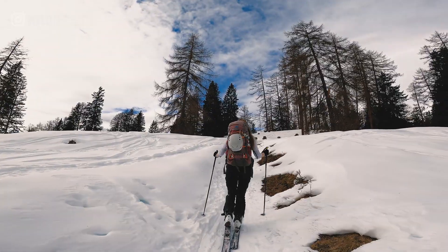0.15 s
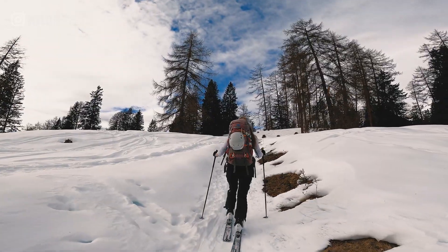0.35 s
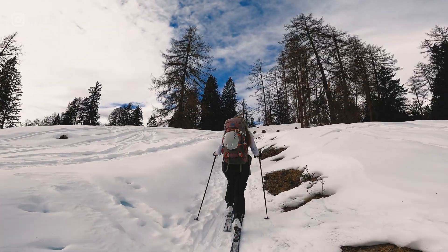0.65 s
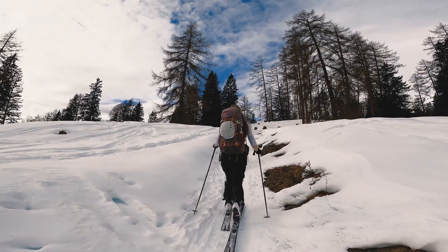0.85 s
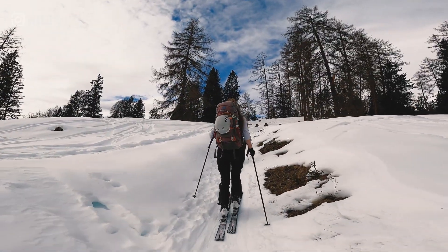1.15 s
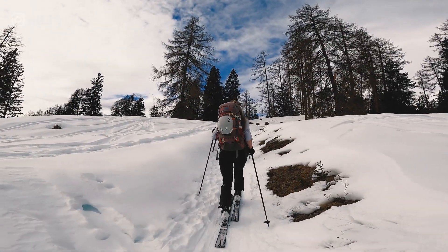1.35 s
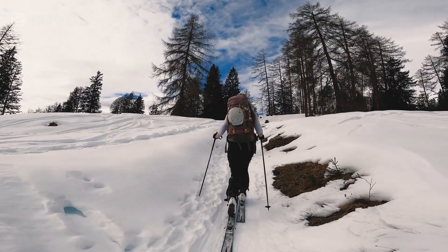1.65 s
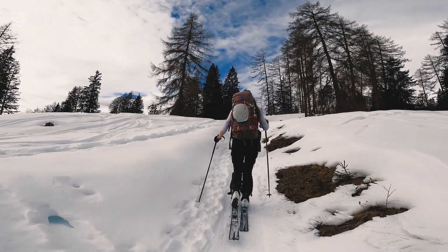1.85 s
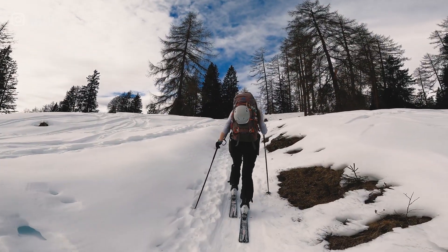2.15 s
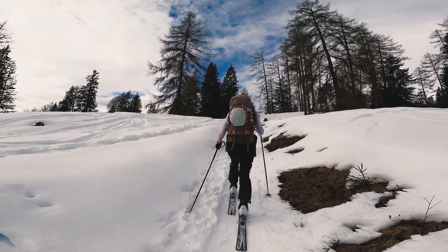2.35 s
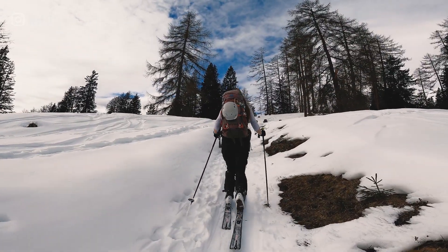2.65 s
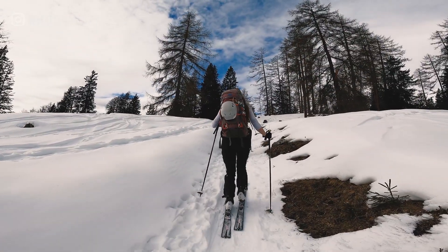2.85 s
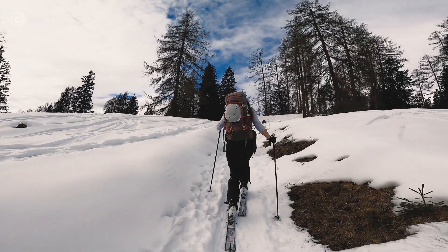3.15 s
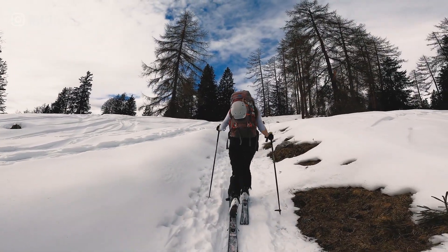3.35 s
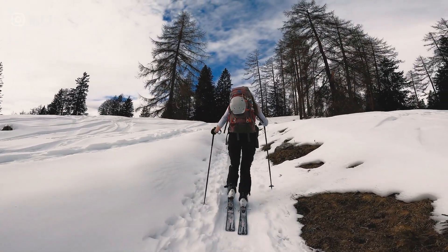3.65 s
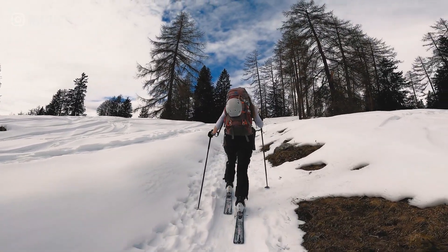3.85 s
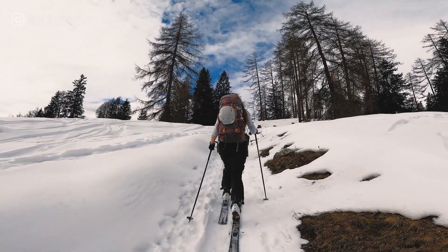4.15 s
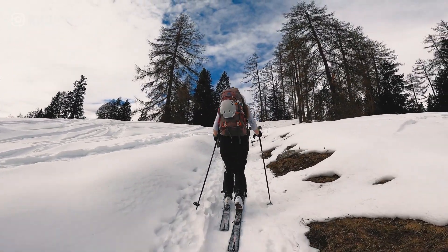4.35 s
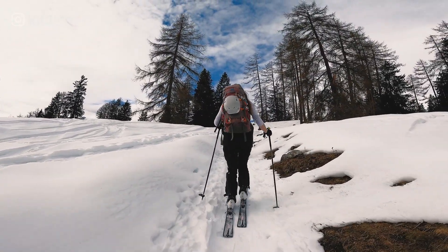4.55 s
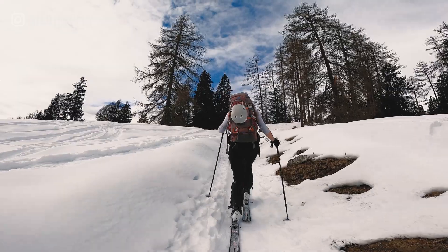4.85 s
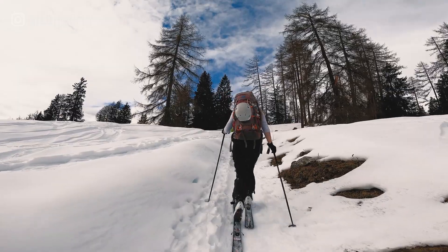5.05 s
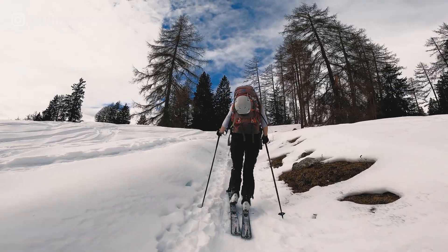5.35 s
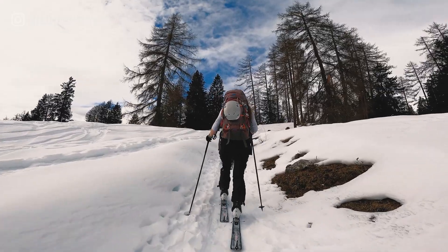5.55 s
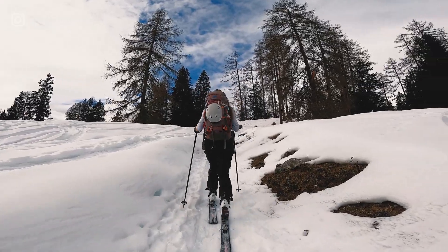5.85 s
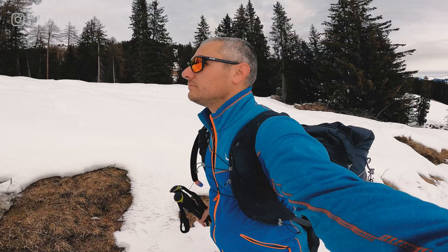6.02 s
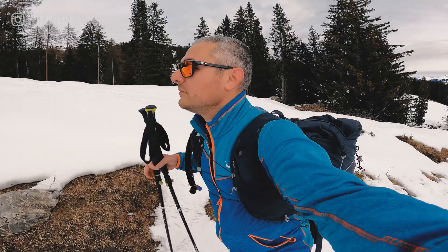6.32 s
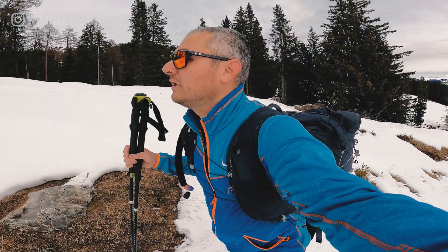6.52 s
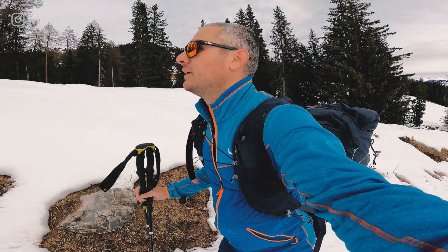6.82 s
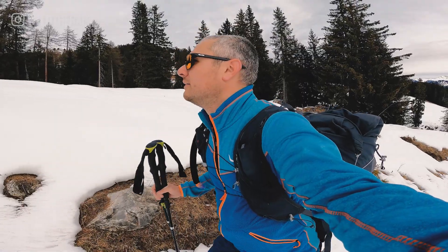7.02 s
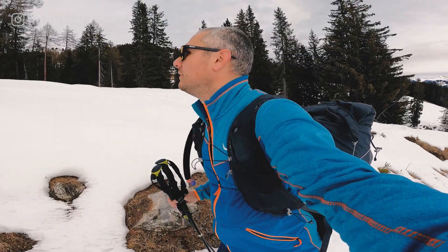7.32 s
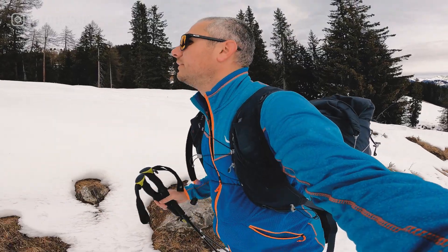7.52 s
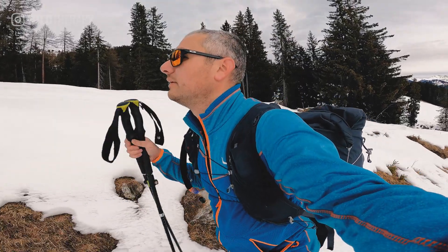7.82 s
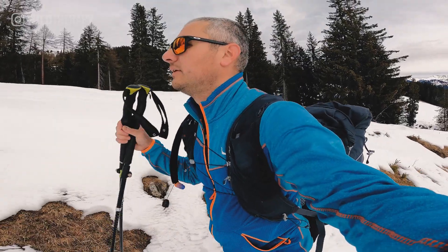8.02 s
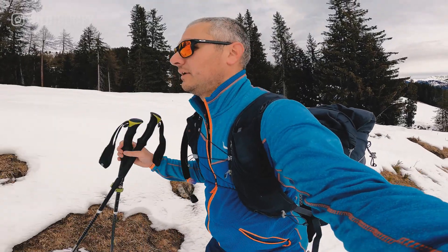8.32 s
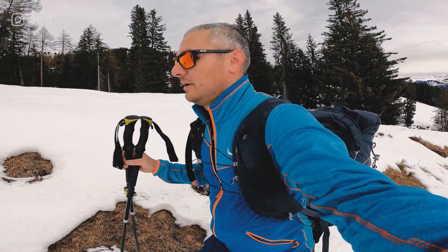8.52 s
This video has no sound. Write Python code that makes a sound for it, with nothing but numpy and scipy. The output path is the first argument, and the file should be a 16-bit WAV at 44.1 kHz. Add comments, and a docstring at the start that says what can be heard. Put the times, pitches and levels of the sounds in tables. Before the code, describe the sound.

Close, dry ski touring steps on hard snow: gritty scraping slides, hollow knocks, crisp crunches and clicks, low wind brushing a hand-held microphone.

```python
"""Ski touring climb over crusted snow

Skins drag over crust: dense grains ring resonances and hiss, crystals sizzle, rubbed skis sing on brief notes.
Each step brings filtered-grain tread and snow packing; wind rumbles as low noise of drifting level.
Dull knocks, probably boots, bindings and poles, are short sagging swings with a thud and a shudder.
Crunches, ticks and a seven-slip creak are resonant noise puffs; slow pushes reach the hand-held microphone.
Open air: no reverberation. Channels are alike but for a faint treble noise, opposite in left and right."""
import sys
import numpy as np
from scipy import signal
from scipy.fft import rfft, irfft, next_fast_len
from scipy.io import wavfile
from scipy.ndimage import uniform_filter1d

SR = 44100
rng = np.random.default_rng(int(sys.argv[2]) if len(sys.argv) > 2 else 0)


def store_pcm(level_fs):
    """Save levels as 16-bit WAV."""
    pcm = np.round(np.clip(level_fs, -1, 1) * 32767).astype(np.int16)
    wavfile.write(sys.argv[1], SR, np.atleast_2d(pcm).T)


N = 382788

# Wind, tread and packing spectra: (frequency [Hz], relative level [dB])
WIND_SPECTRUM = [(12, -11.5), (30, -22), (48, -16), (75, -18.5)]
TREAD_SPECTRUM = [(35, -33), (60, -5), (120, -10.5), (200, -21.5)]
PACKING_SPECTRUM = [(90, 3.5), (150, -0.5), (230, 1.5), (400, -4), (600, -8.5), (850, -11.5), (1200, -17)]
# Wind on the microphone: (time [s], level before the 10 dB gain [dB])
WIND_LEVEL = [(0.0, -63), (0.41, -56), (0.72, -69), (2.17, -62), (2.59, -67), (4.28, -59), (5.44, -61),
              (5.8, -65), (6.31, -49), (6.99, -54), (8.19, -48), (8.68, -57)]
# Weight comes onto a ski: (time [s], hold [s], tread felt through the hand [dB], snow packing [dB])
STEPS = [(0.0, 0.094, -41, -33), (0.44, 0.26, -31.5, -36), (0.86, 0.2, -43, -42), (1.25, 0.1, -28.5, -36.5),
         (1.42, 0.1, -36.5, -37), (2.089, 0.21, -32, -35), (2.78, 0.49, -43.5, -40), (3.5, 0.33, -36, -37),
         (3.8, 0.13, -40, -65), (4.27, 0.2, -40, -37), (4.44, 0.084, -33.5, -37), (5.02, 0.31, -34.5, -39),
         (5.62, 0.011, -37, -41), (5.8, 0.048, -35, -40), (6.13, 0.25, -40, -43), (6.39, 0.1, -38, -35.5),
         (6.86, 0.34, -37.5, -40), (7.562, 0.022, -25, -34.5), (7.9, 0.17, -36.5, -40.5),
         (8.27, 0.065, -29, -39), (8.54, 0.15, -33, -53)]
# Rise and fade times are per 10 dB
STEP_RISE_S, TREAD_FADE_S, PACKING_FADE_S = 0.0086, 0.041, 0.28
TREAD_REST_DB, PACKING_REST_DB = -67, -49.5   # between steps

# A ski slides forward: (time [s], length [s], skin drag [dB], hiss [dB], sizzle [dB])
SLIDES = [(0.0, 0.44, -35.5, -41.5, -46), (0.55, 0.42, -35, -42, -47.5), (1.15, 0.52, -38, -46, -50.5),
          (2.08, 0.38, -39.5, -44, -54), (2.78, 0.15, -43.5, -45, -49.5), (3.0, 0.2, -37, -41.5, -50),
          (3.51, 0.083, -54, -43, -55), (3.73, 0.22, -40, -45.5, -57), (4.27, 0.34, -35.5, -46, -50.5),
          (4.96, 0.42, -41.5, -49, -52), (5.76, 0.16, -39, -45.5, -50), (6.1, 0.41, -40.5, -44.5, -49),
          (6.55, 0.25, -56, -61, -61), (6.84, 0.41, -39, -44.5, -46), (7.5, 0.32, -37, -44, -44.5),
          (7.85, 0.24, -44, -47, -52), (8.23, 0.37, -38, -41, -41.5)]
SLIDE_RISE_S, SLIDE_FADE_S = 0.039, 0.084
# The ski catches and scrapes: (time [s], hold [s], skin drag [dB], hiss [dB], sizzle [dB])
SCRAPES = [(.13, 0.12, -39, -66, -66), (.26, 0.0095, -37, -60, -49), (.41, 0.0097, -60, -34, -61),
           (.6, 0.016, -46, -45, -64), (.76, 0.0072, -29, -54, -63), (.91, 0.021, -30, -38, -67),
           (1.012, 0.018, -29, -42, -65), (1.08, 0.096, -60, -46, -45), (1.335, 0.0084, -51, -44, -40.5),
           (1.38, 0.029, -52, -47, -50), (1.58, 0.021, -34, -41, -43), (1.78, 0.0086, -35.5, -44, -46),
           (1.84, 0.043, -34.5, -41.5, -58), (1.94, 0.04, -51, -45, -42), (2.02, 0.037, -39, -38, -45),
           (2.11, 0.032, -27.5, -33, -40), (2.21, 0.0095, -25.5, -40, -67), (2.255, 0.016, -53, -37, -41),
           (2.36, 0.069, -32, -40, -51), (2.49, 0.018, -29.5, -55, -70), (2.58, 0.0065, -39, -43, -50),
           (2.81, 0.037, -48, -57, -42.5), (3.1, 0.014, -39, -52, -48), (3.51, 0.038, -44, -46, -52),
           (3.6, 0.032, -33.5, -44.5, -62), (3.645, 0.014, -36, -55, -50), (3.75, 0.043, -34, -61, -69),
           (3.93, 0.013, -58, -45, -47), (3.985, 0.018, -45, -55, -45), (4.11, 0.023, -41, -52, -73),
           (4.2, 0.02, -38, -50.5, -51), (4.552, 0.035, -25, -40.5, -46), (4.66, 0.043, -48, -51, -53),
           (4.82, 0.019, -36.5, -46, -64), (4.97, 0.047, -37, -48, -54), (5.13, 0.027, -36.5, -47, -66),
           (5.185, 0.014, -31, -43, -41), (5.435, 0.023, -34.5, -41, -65), (5.49, 0.0078, -44, -56, -49),
           (5.61, 0.06, -42, -48.5, -51), (5.82, 0.017, -34, -57, -46), (5.975, 0.0037, -44, -52, -47),
           (6.07, 0.0078, -37.5, -70, -40), (6.318, 0.0067, -36, -55, -63), (6.43, 0.033, -35, -35.5, -47),
           (6.64, 0.063, -41, -54, -55), (6.783, 0.0044, -31.5, -33, -42),
           (6.809, 0.022, -31.5, -25.5, -28.5), (6.872, 0.0037, -36, -43, -36),
           (6.898, 0.015, -22, -30.5, -37), (7.1, 0.076, -37, -38.5, -47.5), (7.31, 0.0076, -44, -42, -49),
           (7.36, 0.067, -45, -48.5, -50.5), (7.73, 0.04, -35, -37, -62), (7.92, 0.035, -33.5, -51, -48),
           (8.095, 0.022, -37.5, -41, -45), (8.32, 0.057, -35.5, -32.5, -33.5),
           (8.455, 0.1, -57, -33.5, -35.5), (8.64, 0.026, -28.5, -33, -33)]
SCRAPE_RISE_S, SCRAPE_FADE_S = 0.019, 0.015
# Levels while neither ski moves: drag, hiss, sizzle [dB]
SKI_REST_DB = (-48.5, -54, -58.5)

# Resonances of the dragged ski: (frequency [Hz], width [Hz], relative level [dB])
DRAG_MODES = [(1109, 106, 12), (1420, 103, 10.5), (1645, 162, 10.5), (532, 180, 12.5), (850, 840, -3),
              (1900, 770, 0.5)]
# Snow hiss, sizzle and opposite-channel noise spectra: (frequency [Hz], relative level [dB])
HISS_SPECTRUM = [(1200, 18), (2000, 0), (2600, 1.5), (4000, -3), (5500, -29), (8000, -30)]
SIZZLE_SPECTRUM = [(3000, -7), (5500, -10.5), (8000, -10), (11000, -18), (13000, -25), (15500, -40)]
SIDE_SPECTRUM = [(2000, -35), (5000, -5.5), (9000, -2), (11500, 3), (14000, 5.5), (15500, -26)]
# The rubbed ski sings on one note: (time [s], length [s], pitch [Hz], level [dB])
SINGS = [(0.049, 0.022, 1106, -32), (0.127, 0.046, 1400, -33.5), (0.234, 0.022, 4300, -42),
         (0.673, 0.022, 1160, -33.5), (0.782, 0.02, 1520, -32), (1.375, 0.021, 1630, -31),
         (2.15, .02, 1680, -35), (2.194, 0.038, 1180, -30.5), (2.329, 0.052, 2310, -39),
         (2.813, 0.01, 1670, -32), (3.816, 0.02, 1130, -31), (4.381, 0.11, 1410, -43),
         (5.128, 0.016, 1620, -33), (5.222, 0.048, 1500, -34.5), (5.319, 0.023, 1130, -32),
         (5.886, 0.044, 1640, -37), (6.263, 0.0068, 1680, -29), (6.802, 0.026, 2550, -27),
         (7.585, 0.09, 1640, -34), (7.627, 0.061, 1050, -35), (7.757, 0.034, 1440, -31.5),
         (7.776, 0.028, 1080, -32.5), (8.208, 0.015, 1500, -33.5), (8.352, 0.066, 3130, -41),
         (8.373, 0.024, 1650, -33), (8.479, 0.061, 3230, -33.5), (8.493, 0.053, 1970, -37.5)]

# Dull knocks: (time of envelope peak [s], swing level [dB], base pitch [Hz], rise [cycles])
KNOCKS = [(0.081, -13, 323, 0.49), (0.1137, -20.5, 324, 0.75), (0.443, -13.5, 223, 0.59),
          (0.5545, -8.5, 277, 0.28), (0.6077, -9, 547, 0.99), (0.628, -15, 137, 0.31),
          (0.639, -16.5, 217, 0.37), (0.876, -13, 350, 0.27), (1.019, -20.5, 218, 0.91),
          (1.123, -20.5, 423, 0.24), (1.1745, -10, 500, 0.097), (1.2563, -6.5, 332, 0.76),
          (1.317, -16, 350, 0.92), (1.45, -18.5, 151, 0.3), (1.544, -17.5, 200, 0.27),
          (1.569, -15.5, 293, 0.22), (2.088, -7, 460, 0.77), (2.1095, -16.5, 313, 0.4),
          (2.1302, -8.5, 298, 0.19), (2.179, -16.5, 292, 0.59), (2.228, -13, 370, 0.65),
          (2.2344, -21, 258, 0.33), (2.2592, -11.5, 248, 0.48), (2.2642, -13.5, 260, 0.17),
          (2.2903, -15, 231, 0.48), (2.295, -15.5, 260, 0.26), (2.3472, -11.5, 342, 0.67),
          (2.7756, -15, 332, 0.86), (2.812, -25.5, 167, 0.49), (2.8599, -11, 467, 0.98),
          (2.902, -24.5, 204, 0.52), (2.9328, -13, 310, 0.24), (2.9923, -10.5, 540, 0.16),
          (3.0325, -9.5, 323, 0.72), (3.077, -20.5, 530, 1), (3.498, -24, 400, 0.67),
          (3.508, -14, 290, 0.14), (3.538, -17.5, 208, 0.23), (3.612, -17, 388, 0.9),
          (3.619, -17.5, 340, 0.38), (3.633, -10.5, 290, 0.49), (3.709, -22.5, 300, 0.4),
          (3.744, -18, 315, 0.85), (4.2793, -13, 373, 0.82), (4.303, -21, 396, 0.59),
          (4.381, -22, 250, 0.56), (4.399, -19, 205, 0.58), (4.4536, -16.5, 520, 0.77),
          (4.487, -14, 322, 0.55), (4.502, -19, 159, 0.72), (4.605, -14.5, 480, 0.52),
          (4.676, -21.5, 220, 0.7), (4.82, -13, 322, 0.69), (5.0259, -18.5, 194, 0.25),
          (5.0517, -9.5, 487, 1), (5.089, -14.5, 242, 0.48), (5.2175, -17, 156, 0.5),
          (5.268, -10.5, 326, 0.45), (5.8072, -16.5, 387, 1), (5.8243, -14.5, 139, 0.73),
          (6.203, -25, 300, 0.51), (6.2232, -15.5, 162, 0.21), (6.2405, -11, 302, 0.41),
          (6.268, -23, 297, 0.57), (6.3978, -14.5, 317, 0.43), (6.8692, -23.5, 166, 0.39),
          (6.892, -14, 580, 1), (6.9178, -18.5, 367, 0.8), (7.009, -16, 200, 0.59),
          (7.0934, -16, 330, 0.72), (7.11, -8, 340, 0.74), (7.117, -14.5, 133, 0.36),
          (7.128, -33, 260, 0.29), (7.3671, -22.5, 550, 0.37), (7.561, -12, 360, 0.62),
          (7.5714, -20, 220, 0.26), (7.606, -13.5, 363, 0.56), (7.624, -16.5, 274, 0.45),
          (7.745, -22.5, 403, 0.52), (7.7779, -16, 283, 0.61), (7.935, -20.5, 200, 0.57),
          (8.281, -9.5, 142, 0.59), (8.2981, -10, 280, 0.23), (8.3169, -11, 203, 0.17),
          (8.426, -24.5, 198, 0.51), (8.553, -10, 326, 0.47), (8.6472, -13.5, 595, 0.61),
          (8.6743, -20, 318, 0.59)]
# Short crunches: (time [s], peak before low-pass [dB], centre [Hz], T60 [s])
CRUNCHES = [(0.333, -26, 1200, 0.025), (0.386, -26, 1050, 0.035), (0.443, -20, 720, 0.032),
            (0.489, -16.5, 1180, 0.033), (0.553, -26, 1660, 0.048), (0.7605, -10.5, 1620, 0.033),
            (0.91, -12, 1250, 0.047), (1.172, -18.5, 1310, 0.059), (1.253, -19.5, 1650, 0.067),
            (1.315, -16, 820, 0.047), (1.838, -18, 1140, 0.12), (1.917, -24, 1600, 0.17),
            (2.022, -19, 1670, 0.04), (2.117, -19, 1020, 0.07), (2.36, -17.5, 1500, 0.056),
            (2.492, -21, 850, 0.049), (2.771, -22.5, 1420, 0.056), (2.928, -23, 1040, 0.039),
            (2.988, -15.5, 1010, 0.066), (3.032, -19, 1060, 0.15), (3.5065, -12.5, 1120, 0.051),
            (3.5347, -14.5, 1090, 0.086), (3.606, -15.5, 1000, 0.088), (4.478, -18.5, 1060, 0.044),
            (4.561, -23, 850, 0.05), (4.818, -21.5, 810, 0.051), (5.0875, -17, 1070, 0.073),
            (5.174, -26, 1450, 0.05), (5.211, -21.5, 1500, 0.029), (5.828, -17, 1040, 0.034),
            (6.074, -17.5, 1320, 0.033), (6.145, -15.5, 750, 0.0058), (6.503, -19.5, 1030, 0.038),
            (6.888, -11.5, 1150, 0.12), (6.957, -18.5, 1130, 0.044), (7.089, -22, 1360, 0.081),
            (7.552, -17.5, 1840, 0.04), (8.208, -37, 1530, 0.049), (8.249, -18, 1530, 0.23),
            (8.552, -16.5, 1330, 0.044), (8.615, -21, 1160, 0.035), (8.644, -20, 1150, 0.086)]
# Sharp ticks: (time [s], peak before 1 dB gain and low-pass [dB], centre [Hz], T60 [s])
TICKS = [(0.357, -30, 3150, 0.015), (0.411, -19, 3050, 0.02), (0.422, -31, 2600, 0.015),
         (0.4885, -20.5, 2340, 0.044), (1.9071, -26, 3360, 0.019), (1.9726, -23.5, 2520, 0.02),
         (1.997, -24, 3000, 0.015), (2.1999, -26, 2940, 0.019), (2.251, -22, 3070, 0.012),
         (3.0568, -27, 3070, 0.018), (3.287, -28, 3370, 0.017), (3.5064, -19, 2400, 0.021),
         (3.5344, -21.5, 2390, 0.025), (3.7798, -24, 2780, 0.06), (3.8204, -27, 3500, 0.012),
         (3.9208, -20.5, 2380, 0.014), (3.921, -21, 7660, 0.013), (4.2765, -27, 2180, 0.038),
         (4.757, -24, 2430, 0.0097), (4.8165, -19.5, 2300, 0.0033), (5.4917, -23, 2470, 0.0081),
         (5.6116, -31, 2580, 0.0075), (6.0743, -23, 3950, 0.038), (6.137, -20, 2900, 0.0068),
         (6.1658, -19, 2800, 0.0067), (6.1912, -12, 2700, 0.01), (6.2198, -20, 2900, 0.008),
         (6.224, -24, 3800, 0.008), (6.238, -25, 4500, 0.013), (6.245, -25, 3200, 0.008),
         (6.335, -28, 3000, 0.012), (6.3645, -22, 2650, 0.1), (6.4324, -8, 2700, 0.0091),
         (6.8024, -21, 2390, 0.073), (7.0374, -22, 3200, 0.031), (7.1067, -21, 2480, 0.01),
         (7.16, -27, 4000, 0.012), (7.2764, -27, 2720, 0.02), (7.5552, -14, 3970, 0.03),
         (8.018, -33, 2600, 0.01), (8.029, -27.5, 3200, 0.01), (8.0901, -19, 3540, 0.096),
         (8.2774, -9, 4760, 0.012), (8.3352, -6.5, 3800, 0.0043), (8.345, -21, 4500, 0.02),
         (8.4462, -20, 3360, 0.014), (8.642, -18, 2850, 0.009), (8.6542, -9.5, 2470, 0.013)]
CREAK_START_S, CREAK_GAP_S = 5.315, 0.016
CREAK_DB, CREAK_HZ, CREAK_T60_S = -31, 3000, 0.0079   # mean level and pitch
# Slow pushes on the microphone: (onset [s], dip level before high-pass [dB], onset to dip [s])
PUSHES = [(6.1474, -3, 0.0014), (6.2427, -8, 0.001), (6.472, -9, 0.0019)]

# Gain of the highest treble: (time [s], level [dB])
TREBLE_LEVEL = [(0.0, -15), (2.6, -12.5), (3.6, -5), (6.0, -7), (6.1, -2.5), (8.68, -5)]
TREBLE_HZ, CUTOFF_HZ = 6730, 15650


def amp(db):
    """Decibels to gain."""
    return 10 ** (np.asarray(db) / 20)


def rms_one(x):
    """Scale to unit rms."""
    return x / np.sqrt(np.mean(x ** 2) + 1e-20)


def lowpass(x, order, hz):
    """Butterworth low-pass."""
    return signal.sosfilt(signal.butter(order, hz, fs=SR, output="sos"), x)


def drift(rate_hz):
    """Smooth random wander, rms 1: noise through two equal poles near rate_hz."""
    step = 10   # samples between points
    r = np.exp(-2 * np.pi * rate_hz * step / SR)
    settle = 2000
    noise = rng.standard_normal(N // step + settle + 2)
    slow = signal.lfilter([1], [1, -2 * r, r * r], noise)[settle:]
    return np.interp(np.arange(N) / step, np.arange(len(slow)), rms_one(slow))


def colour(x, spectrum):
    """Shape by a (Hz, dB) spectrum; rms 1."""
    hz, db = np.transpose(spectrum)
    size = next_fast_len(N)
    f = np.maximum(np.fft.rfftfreq(size, 1 / SR), 1)
    gain = amp(np.interp(np.log(f), np.log(hz), db, left=-80, right=-80))
    return rms_one(irfft(rfft(x, size) * gain, size)[:N])


def resonate(x, hz, width_hz):
    """Two-pole resonance, gain about 1 at its peak."""
    r = np.exp(-np.pi * width_hz / SR)
    poles = [1, -2 * r * np.cos(2 * np.pi * hz / SR), r * r]
    return signal.lfilter([(1 - r * r) / 2, 0, (r * r - 1) / 2], poles, x)


def grains(per_s, spread_db, clump_db, clump_hz):
    """Crystals break at random with uneven sizes, in clumps; rms 1."""
    sizes = amp(spread_db * np.minimum(rng.exponential(1, N), 5)) * rng.choice([-1, 1], N)
    born = rng.random(N) < per_s / SR
    return rms_one(sizes * born * amp(clump_db * drift(clump_hz)))


def add(out, s, sound):
    """Mix a short sound in at time s."""
    i = max(round(s * SR), 0)
    out[i:i + len(sound)] += sound[:N - i]


def in_time(rows):
    """Interpolate a (s, dB) table to a gain at every sample."""
    s, db = np.transpose(rows)
    return amp(np.interp(np.arange(N) / SR, s, db))


def strokes(rows, rise_s, fade_s):
    """Each row rises, holds and fades; summed power of each dB column, every 44 samples."""
    s, hold_s, *levels_db = np.transpose(rows)
    t = np.arange(N // 44 + 2)[:, None] * 44 / SR - s
    before, after = np.maximum(-t, 0), np.maximum(t - hold_s, 0)
    fall_db = 10 * (before / rise_s + after / fade_s)
    return amp(2 * np.array(levels_db)) @ amp(-2 * fall_db).T


def as_gain(power):
    """Power every 44 samples to a gain at every sample."""
    return np.interp(np.arange(N) / 44, np.arange(len(power)), np.sqrt(power))


def wind():
    """Lumpy rumble: low noise whose strength wanders in gusts."""
    gusts = rng.standard_normal(N) * amp(0.67 * drift(6.2))
    return in_time(WIND_LEVEL) * amp(10) * colour(gusts, WIND_SPECTRUM)


def footsteps():
    """Weight shifts excite the body's tread through the hand and the soft, dense packing of snow."""
    tread_power = strokes(STEPS, STEP_RISE_S, TREAD_FADE_S)[0]
    packing_power = strokes(STEPS, STEP_RISE_S, PACKING_FADE_S)[1]
    tread_gain = as_gain(tread_power + amp(2 * TREAD_REST_DB))
    packing_gain = as_gain(packing_power + amp(2 * PACKING_REST_DB))
    lumps = grains(1200, 2, 3, 30)
    return tread_gain * colour(lumps, TREAD_SPECTRUM) + packing_gain * colour(lumps, PACKING_SPECTRUM)


def ski_motion():
    """Powers of slides and scrapes add up: gains of drag, hiss and sizzle."""
    slides = strokes(SLIDES, SLIDE_RISE_S, SLIDE_FADE_S)
    scrapes = strokes(SCRAPES, SCRAPE_RISE_S, SCRAPE_FADE_S)
    return [as_gain(p + amp(2 * rest_db)) for p, rest_db in zip(slides + scrapes, SKI_REST_DB)]


def cracks(per_s=36, spread_db=2.5, fade_s=0.0036):
    """Pieces of crust snap at random: a gain that jumps up and fades within milliseconds."""
    sizes = amp(spread_db * np.minimum(rng.exponential(1, N), 1.5))
    snaps = (rng.random(N) < per_s / SR) * sizes
    return 1 + signal.lfilter([1], [1, -np.exp(-1 / (fade_s * SR))], snaps + 1e-18)


def level_out(x):
    """Divide by the running rms over 6000 samples."""
    return x / np.sqrt(uniform_filter1d(x ** 2, size=6000))


def drag(effort):
    """Dense rubbing rings the ski's modes, now one and now another standing out."""
    rub = grains(2000, 2.8, 1.5, 80)
    patchy_db, patch_hz = 2.5, 8.9
    rings = np.zeros(N)
    for k, (hz, width_hz, db) in enumerate(DRAG_MODES):
        patchy_rub = rub * amp(patchy_db * drift(patch_hz))
        rings += amp(db) * (-1) ** k * resonate(patchy_rub, hz, width_hz)
    return effort * level_out(rings)   # colour wanders, effort sets the level


def crackle(clicks, low_hz, high_hz, sharpness, patchy_db, count):
    """Grains dealt to crystals of many sizes, each size coming and going on its own."""
    dealt = rng.integers(0, count, N)
    out = np.zeros(N)
    for k, hz in enumerate(np.geomspace(low_hz, high_hz, count)):
        own = clicks * (dealt == k) * amp(patchy_db * drift(7.7))
        out += resonate(own + 1e-18, hz, hz / sharpness) / np.sqrt(hz)
    return out


def crystals(hiss, sizzle, shared=0.038, side_db=-19, chips_db=-7):
    """Ringing grains hiss with lone chips; finer grains sizzle.

    A faint treble noise, opposite in left and right, follows the sizzle level."""
    coarse, fine = grains(5000, 2.8, 1.5, 70), grains(7000, 2.6, 1.5, 60)
    hissing = level_out(colour(crackle(coarse, 1900, 7000, 12, 4, count=16), HISS_SPECTRUM))
    chips = rms_one(crackle(grains(350, 4, 3, 12), 1000, 4500, 7, 2, count=8))
    sizzling = colour(shared * coarse + fine, SIZZLE_SPECTRUM)
    mid = hiss * (hissing + amp(chips_db) * chips) + sizzle * sizzling
    side = sizzle * amp(side_db) * colour(rng.standard_normal(N), SIDE_SPECTRUM)
    return np.array([mid + side, mid - side])


def sings(sharpness=8.2, edge_s=0.0067):
    """Gritty rubbing noise passes twice through one narrow resonance, making a brief note."""
    out, t = np.zeros(N), np.arange(round(0.14 * SR)) / SR
    for s, length_s, hz, db in SINGS:
        grit = rng.standard_normal(len(t)) ** 3
        width_hz = hz / sharpness
        note = rms_one(resonate(resonate(grit, hz, width_hz), hz, width_hz))
        envelope = np.tanh(t / edge_s) * np.exp(-np.maximum(t - length_s, 0) / edge_s)
        add(out, s, amp(db) * note * envelope)
    return out


def knocks(sag=0.13, snap_cycles=0.3, lean=0.8):
    """A blow: a few cycles that start high and sag in pitch, a low thud, then a dull shudder."""
    thud_db, thud_hz, thud_s = -9, 150, 0.0085
    tail_db, tail_hz, tail_width_hz, tail_s = -15, 150, 236, 0.025
    out, t = np.zeros(N), np.arange(round(0.12 * SR)) / SR
    for s, db, hz, cycles in KNOCKS:
        rise_s = max(cycles, 0.1) / hz
        u = t / rise_s
        phase = rng.normal(-0.46, 0.16)   # random start, in cycles; the swing may peak up or down
        turns = hz * t * (1 - sag * np.tanh(u / 6)) + snap_cycles * np.tanh(u) + phase
        swing = (u * np.exp(1 - u)) ** lean * np.sin(2 * np.pi * turns)
        noise = rng.standard_normal(len(t))
        dull = resonate(resonate(noise, tail_hz, tail_width_hz), tail_hz, tail_width_hz)
        shudder = rms_one(dull) * np.tanh(u / 3) * np.exp(-t / tail_s)
        thud = np.tanh(u) * np.exp(-t / thud_s) * np.cos(2 * np.pi * thud_hz * (t - rise_s))
        add(out, s - rise_s, amp(db) * (swing + amp(thud_db) * thud + amp(tail_db) * shudder))
    return out


def bursts(table, sharpness, rise_s, gain_db, top_hz, bite=0.78):
    """A snap and a fast-dying puff of noise excite a resonance with steep skirts."""
    out, t = np.zeros(N), np.arange(round(0.1 * SR)) / SR
    at_rise = np.arange(len(t)) == round(rise_s * SR)
    for s, db, hz, t60_s in table:
        puff = rng.standard_normal(len(t)) * np.tanh(t / rise_s) * amp(-60 * t / max(t60_s, 0.002))
        snap = bite * np.sqrt(SR * sharpness / hz) * at_rise
        sound = resonate(resonate(puff + snap, hz, hz / sharpness), hz, 1.9 * hz)
        add(out, s, amp(db + gain_db) * sound / np.abs(sound).max())
    return lowpass(out + 1e-18, 2, top_hz)


def crunches():
    """Short crunches: puffs in a fairly narrow resonance."""
    return bursts(CRUNCHES, sharpness=6, rise_s=0.0006, gain_db=0, top_hz=3000)


def ticks():
    """Sharp ticks: faster-rising puffs in a broader, higher resonance."""
    return bursts(TICKS, sharpness=2.5, rise_s=0.0002, gain_db=1, top_hz=7000)


def creak():
    """Something under strain slips seven times at uneven gaps."""
    slips = []
    for k in range(7):
        a, b, c = rng.normal(0, 1, 3)
        s = CREAK_START_S + CREAK_GAP_S * (k + 1.4 * a)
        slips.append((s, CREAK_DB + 2 * b, CREAK_HZ * (1 + 0.078 * c), CREAK_T60_S))
    return bursts(slips, sharpness=2.5, rise_s=0.0002, gain_db=0, top_hz=7000)


def pushes():
    """A pressure dip that a high-pass makes swing back slowly."""
    out, t = np.zeros(N), np.arange(round(0.1 * SR)) / SR
    highpass = signal.butter(1, 27, "high", fs=SR, output="sos")
    for s, db, width_s in PUSHES:
        dip = (t / width_s) ** 2 * np.exp(2 - 2 * t / width_s)
        add(out, s, -amp(db) * signal.sosfilt(highpass, dip))
    return out


def scene():
    """Sum the close sources, which reach both channels alike but for the faint treble noise."""
    snapping = cracks()
    effort, hiss, sizzle = ski_motion()
    # snaps show most in the hiss, least in the drag
    effort = effort * rms_one(snapping ** 0.45)
    hiss = hiss * rms_one(snapping)
    sizzle = sizzle * rms_one(snapping ** 0.8)
    crust = drag(effort) + crystals(hiss, sizzle) + sings()
    return wind() + footsteps() + crust + knocks() + crunches() + ticks() + creak() + pushes()


def record(dry):
    """A treble shelf follows its level table; a steep low-pass cuts the top."""
    split = signal.butter(4, TREBLE_HZ, fs=SR, output="sos")
    below = signal.sosfiltfilt(split, dry)
    shelved = below + in_time(TREBLE_LEVEL) * (dry - below)
    return signal.sosfilt(signal.cheby2(12, 70, CUTOFF_HZ, fs=SR, output="sos"), shelved)


dry = scene()
out = record(dry)
store_pcm(out)
```